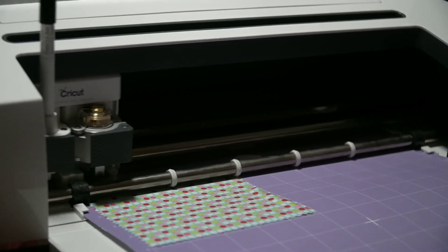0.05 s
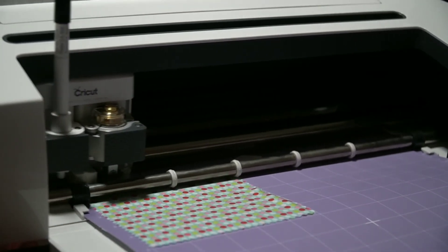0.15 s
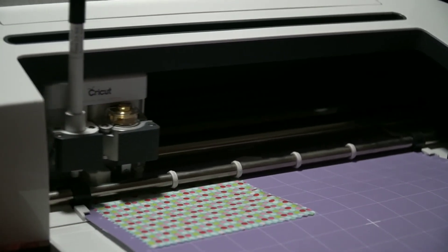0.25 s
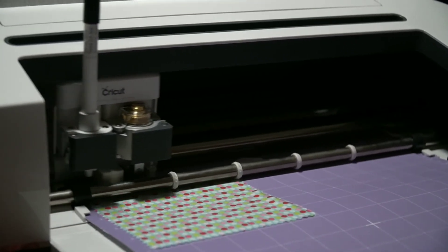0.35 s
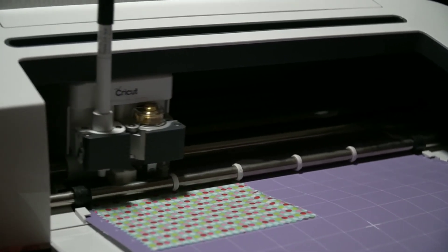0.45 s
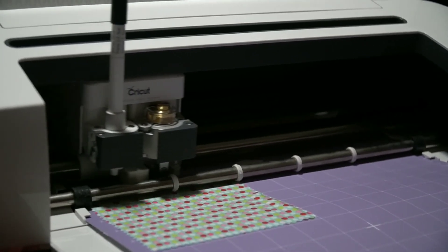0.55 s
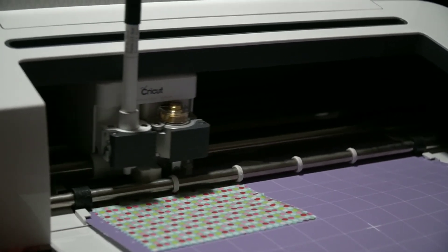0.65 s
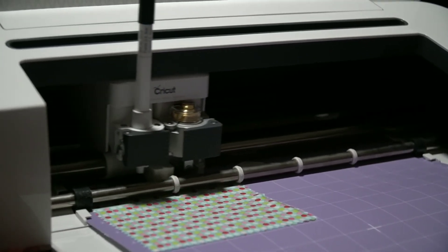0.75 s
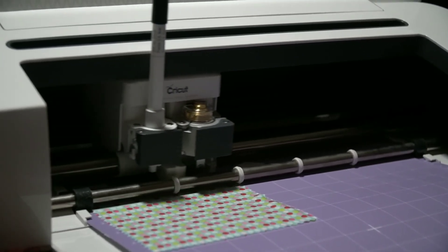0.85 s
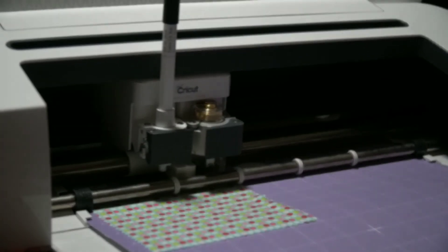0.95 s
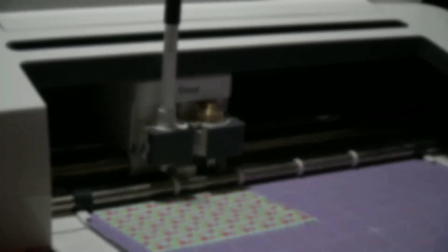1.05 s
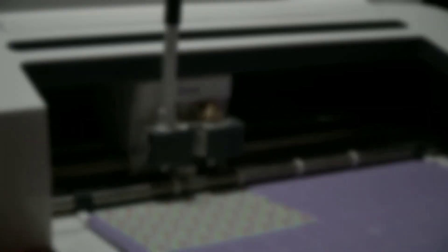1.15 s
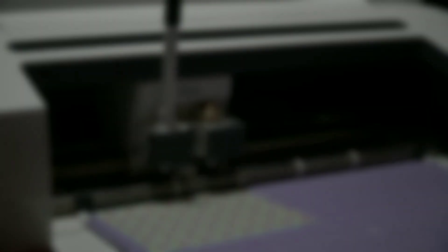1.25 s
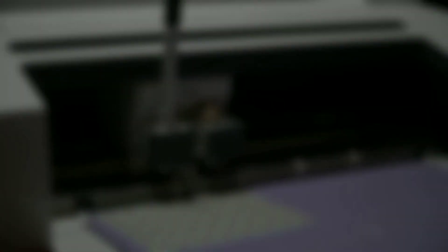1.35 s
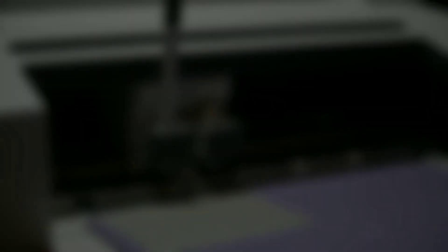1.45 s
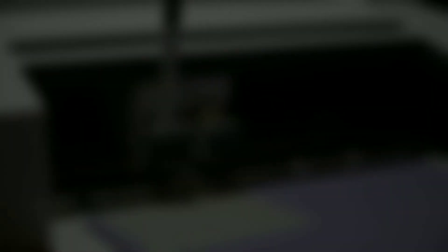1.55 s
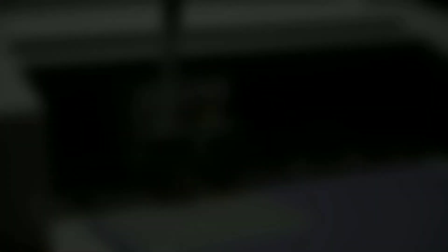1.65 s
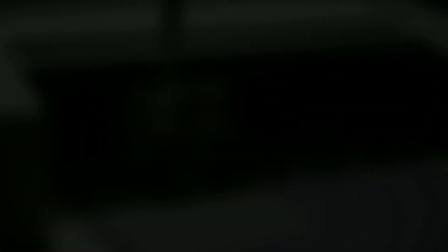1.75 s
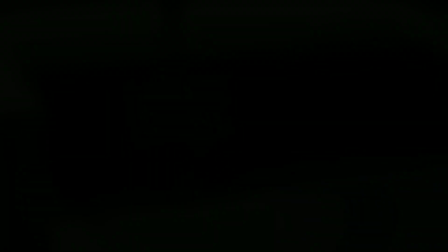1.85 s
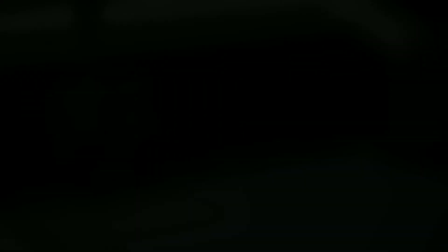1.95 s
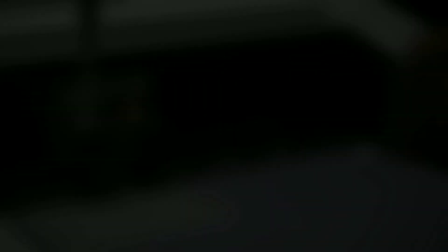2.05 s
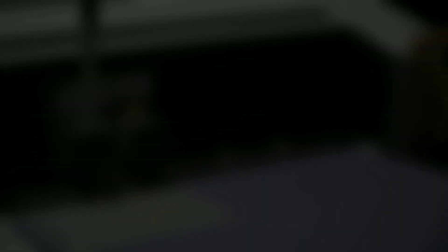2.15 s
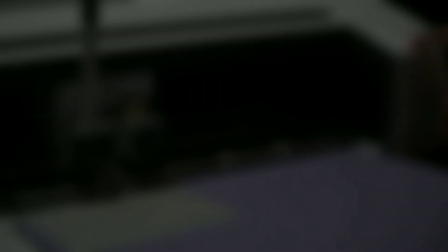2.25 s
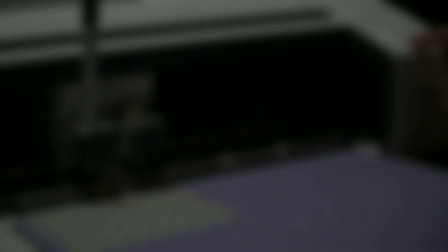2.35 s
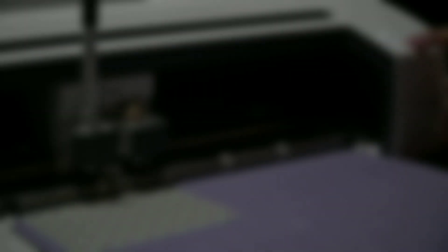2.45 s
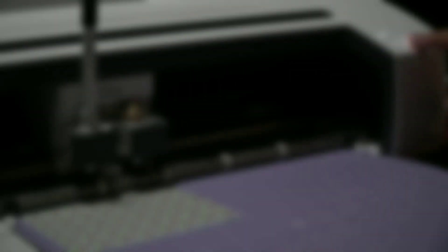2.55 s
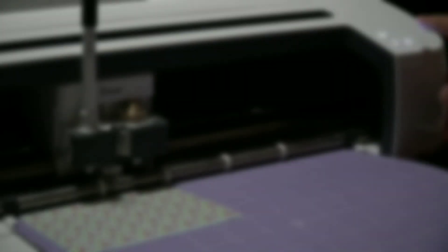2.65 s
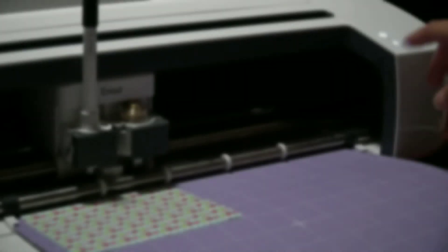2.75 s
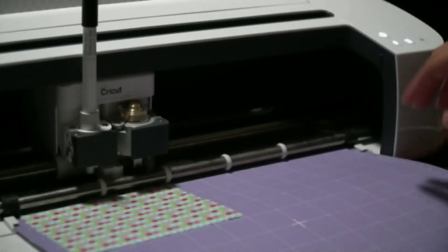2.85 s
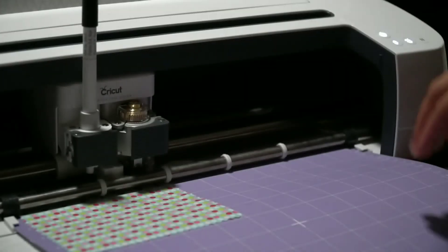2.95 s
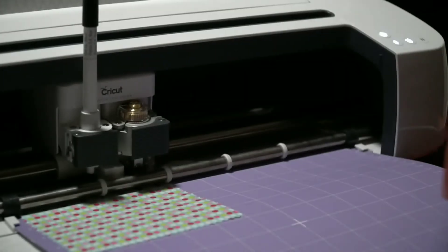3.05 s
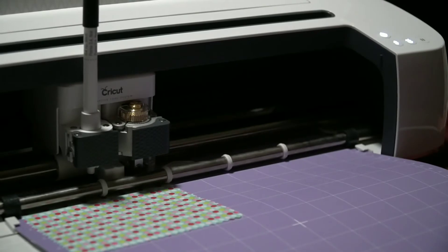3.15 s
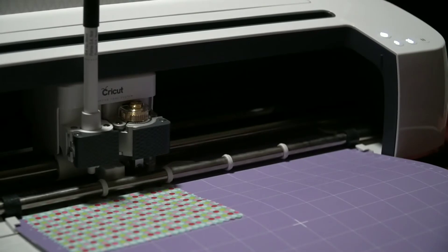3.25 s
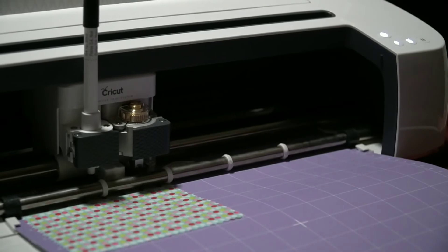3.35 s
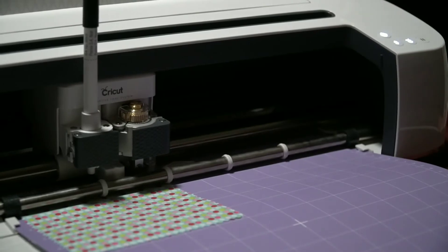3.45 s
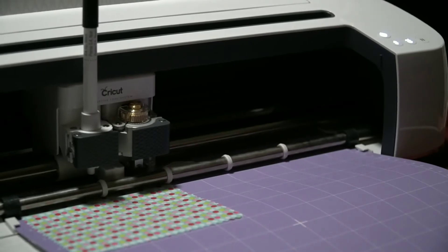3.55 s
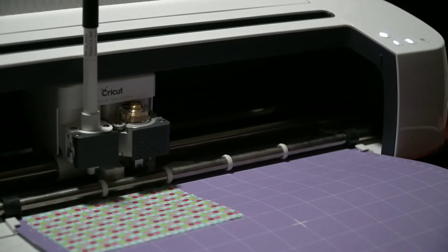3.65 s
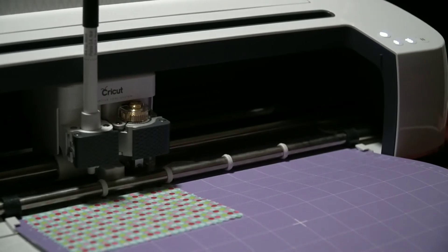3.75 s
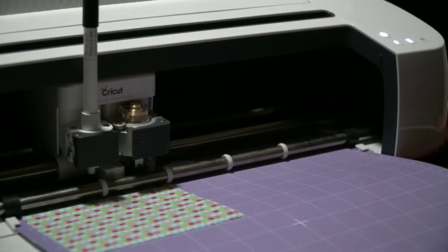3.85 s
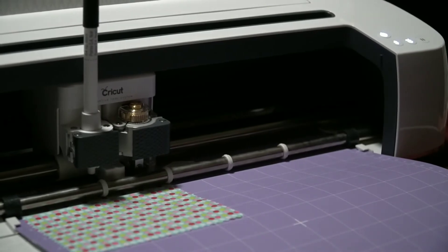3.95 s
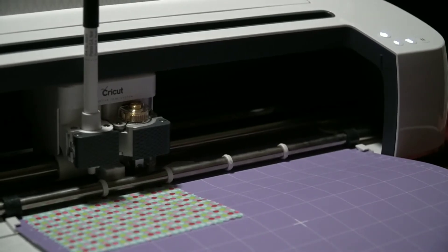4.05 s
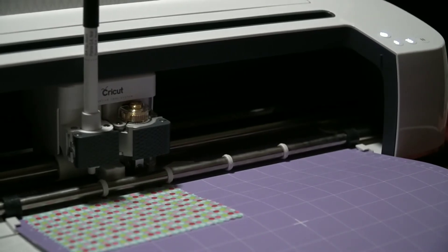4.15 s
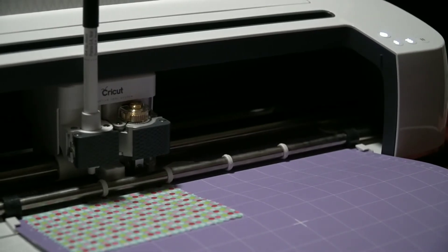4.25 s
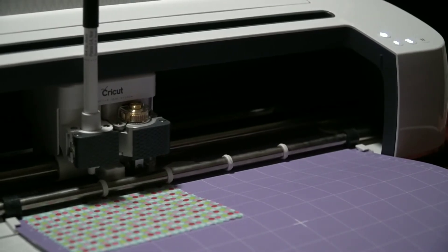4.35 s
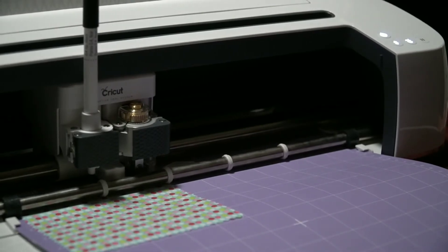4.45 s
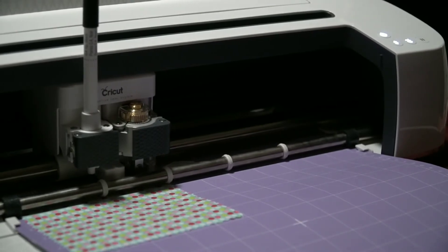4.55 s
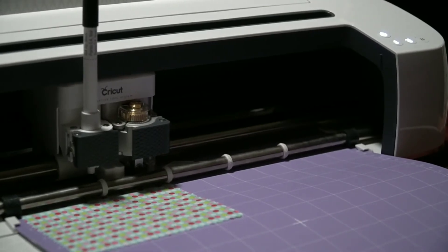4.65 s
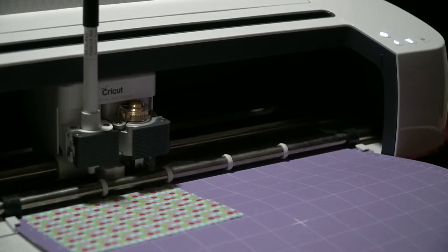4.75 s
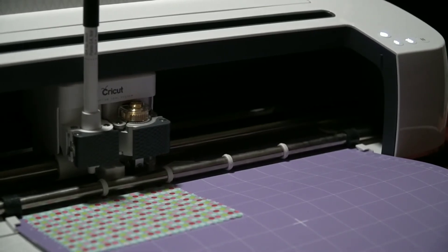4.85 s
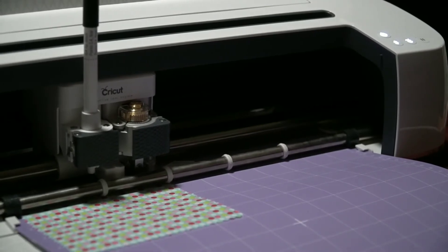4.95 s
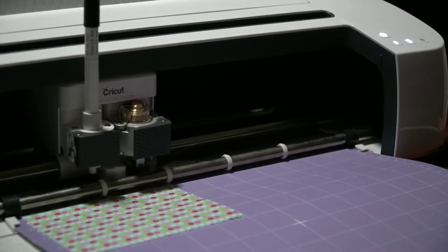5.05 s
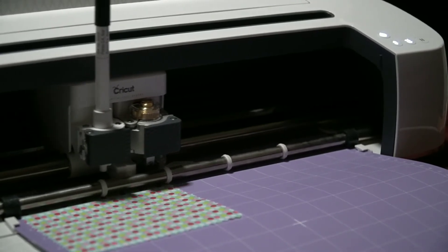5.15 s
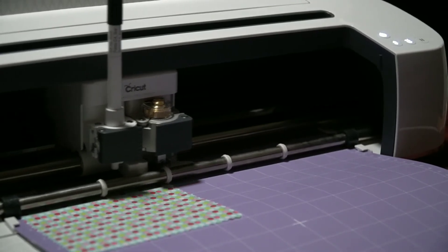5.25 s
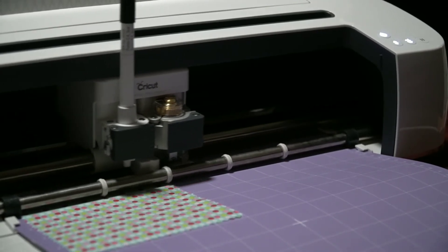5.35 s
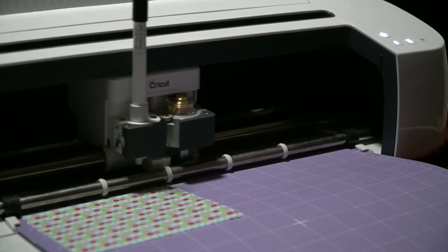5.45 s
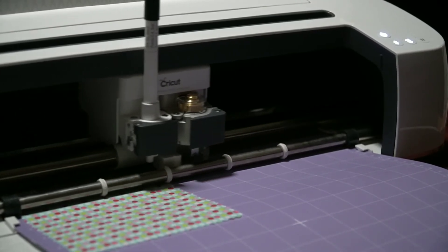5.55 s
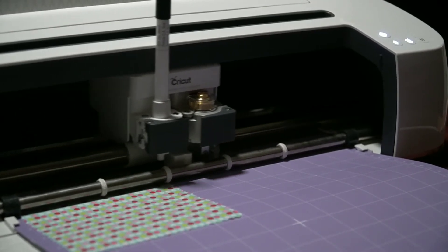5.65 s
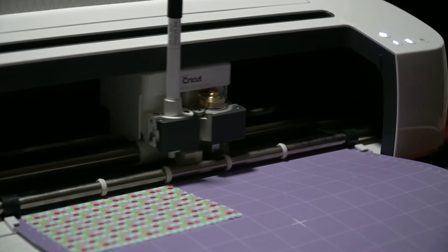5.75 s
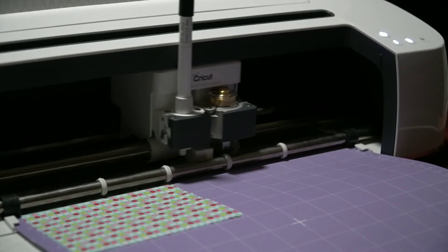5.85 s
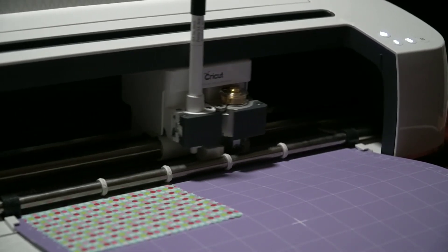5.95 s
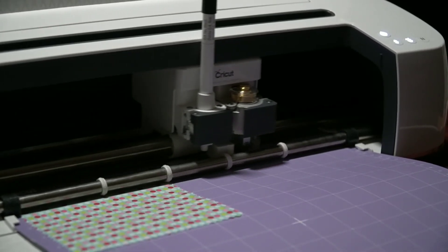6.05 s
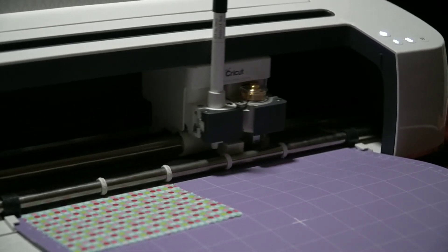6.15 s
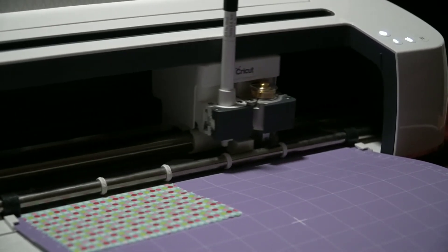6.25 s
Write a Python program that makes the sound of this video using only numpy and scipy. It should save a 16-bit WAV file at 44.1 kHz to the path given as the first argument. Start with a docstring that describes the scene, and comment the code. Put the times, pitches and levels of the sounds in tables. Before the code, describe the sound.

Close stereo pickup in a small room: a cutting machine's carriage is already driving, a buzzy geared whine with rasp and bright rail scratching. It brakes quickly to silence, leaving low hum, soft fan air and thin rapid chirps. A plastic button clicks down and up, the machine idles, then a tiny click and squeak start the same whir again to the end.

```python
"""Desktop cutting machine in a small room

The carriage drives along its rail, the machine idles, a button is pressed, and the carriage drives on.
Sliding gear tones and a part-repeating noise make the motor's whine and rasp; noise rings the rail, with one
tick a turn. A squeak and clicks are decaying partials and noise. Under it lie a wavering mains hum, a fan of
blade tone and air noise, thin chirps about seven times a second, a soft swish and a short low rumble."""
import sys
import numpy as np
from scipy import signal
from scipy.fft import rfft, irfft
from scipy.io import wavfile

SR = 44100
rng = np.random.default_rng(int(sys.argv[2]) if len(sys.argv) > 2 else 0)


def store_wav(level_fs):
    """Save 16-bit WAV to argv[1]."""
    pcm = np.round(np.clip(np.atleast_2d(level_fs), -1, 1) * 32767)
    wavfile.write(sys.argv[1], SR, pcm.T.astype(np.int16))


N = 277389
TIME = np.arange(N) / SR                                   # s
FREQ = np.maximum(np.arange(N // 2 + 1) * SR / N, 1)       # Hz, kept above zero for the logarithm
OPPOSITE = np.array([[1], [-1]])                           # left and right with opposite sign


def from_db(db):
    """Decibels to gain."""
    return 10 ** (np.asarray(db) / 20)


def in_time(rows, t=TIME):
    """Each column of a curve, read at the times t."""
    s, *columns = np.transpose(rows)
    return [np.interp(t, s, column) for column in columns]


def over_hz(points, axis=1):
    """One column of a spectrum at every frequency, drawn over log frequency."""
    points = np.array(points)
    return np.interp(np.log(FREQ), np.log(points[:, 0]), points[:, axis])


def rms_one(x):
    """Scale to unit power."""
    return x / np.sqrt(np.mean(np.abs(x) ** 2) + 1e-20)


def drift(rate_hz):
    """Smooth random wander of spread 1: twice low-passed noise, drawn every 40 samples."""
    step = 40
    r = np.exp(-2 * np.pi * rate_hz * step / SR)
    noise = rng.standard_normal(N // step + 2002)
    slow = signal.lfilter([1], [1, -2 * r, r * r], noise)[2000:]   # skip the filter's settling
    return np.interp(np.arange(N) / step, np.arange(len(slow)), rms_one(slow))


def cycles(rate, zero_s):
    """Cycles done at a changing rate, counted from a given moment."""
    count = np.cumsum(rate) / SR
    return count - np.interp(zero_s, TIME, count)


def pair(two, likeness):
    """Two unrelated signals become left and right with a given correlation."""
    c = np.clip(likeness, -1, 1)
    return np.sqrt((1 + c) / 2) * two[0] + np.sqrt((1 - c) / 2) * two[1] * OPPOSITE


def pan(balance_db):
    """Gains for left and right; positive leans left."""
    return from_db(0.5 * OPPOSITE * balance_db)


def white():
    """Two noises of 0 dB per Hz."""
    return rng.standard_normal((2, N)) * np.sqrt(SR / 2)


def colour(two, db, likeness):
    """Give two noises a spectrum and a stereo width."""
    return irfft(pair(rfft(two), likeness) * from_db(db), N)


def cut(x, hz, kind, order=2):
    """Butterworth filter."""
    sos = signal.butter(order, hz, kind, fs=SR, output="sos")
    return signal.sosfilt(sos, x + 1e-18)


def resonance(x, hz, width_hz):
    """Band resonance with gain 1 on top."""
    r = np.exp(-np.pi * width_hz / SR)
    zeros = np.array([1, 0, -1]) * (1 - r * r) / 2
    poles = [1, -2 * r * np.cos(2 * np.pi * hz / SR), r * r]
    return signal.lfilter(zeros, poles, x + 1e-18)


def burst(age, rise_s, t60):
    """Envelope of a contact: quick rise, exponential fall."""
    age = np.clip(age, 0, 2 * t60)
    return (1 - np.exp(-age / rise_s)) * from_db(-60 * age / t60)


def carriage(index):
    """One run: the motor ramps its speed steadily up and down; gears and rail grow loud with the speed."""
    # carriage runs: start_s, standstill_s, gear_db, gear_fade_db_per_s,
    # rail_friction_db, rail_fade_db_per_s, tick_over_friction_db
    runs = [(-.055, 1.145, -32, 0, -42, -3.5, 13), (5.037, 6.6, -31.5, -2, -45.5, -1.1, 12.5)]
    # where the drive stands in each run: turns_per_s, tick_s, gear_wheel_crest_s, pulley_crest_s
    drive = [(50.22, .1052, .123, .115), (50.18, 5.1981, 5.267, 5.286)]
    start_s, stop_s, gear_db, gear_fade, rail_db, rail_fade, tick_db = runs[index]
    rate, tick_s, wheel_s, pulley_s = drive[index]
    speed_up_s, brake_s = 0.135, 0.17
    gear_speed_power, rail_speed_power = 1.47, 6
    wheel_turns, pulley_turns = 4, 6                # motor turns per revolution
    wheel_surge_db, pulley_surge_db = 0.9, 0.46

    speeding_up = (TIME - start_s) / speed_up_s
    braking = (stop_s - TIME) / brake_s
    speed = np.clip(np.minimum(speeding_up, braking), 0, 1)
    age = np.clip(TIME, start_s, stop_s) - start_s
    turns = cycles(rate * speed, tick_s)

    # two slightly eccentric wheels make the gears surge
    wheel = np.cos(2 * np.pi * cycles(rate * speed / wheel_turns, wheel_s))
    pulley = np.cos(2 * np.pi * cycles(rate * speed / pulley_turns, pulley_s))
    surge_db = wheel_surge_db * wheel + pulley_surge_db * pulley
    gear_gain = speed ** gear_speed_power * from_db(gear_db + gear_fade * age + surge_db)

    # the rail is rougher in some places than in others
    patches_db = 1.25 * drift(14)
    rail_gain = speed ** rail_speed_power * from_db(rail_db + rail_fade * age + patches_db)
    return gear_gain * gears(turns, speed, rate, index) + rail_gain * rail(turns, rate, tick_db)


def gears(turns, speed, rate, index, flutter=0.5, repeat_share=0.39, spread_rad=0.23):
    """Mesh tones over a rasp that partly repeats, as the same teeth meet every fourth turn at full speed."""
    # motor turning, mesh tones and sidebands at full speed: pitch_hz, first_run_db, second_run_db
    tone_rows = [(50.1, -27, -29), (275.6, -25, -24), (527, -23, -28), (551.3, -18.5, -20),
                 (826.6, -14.5, -15.5), (877, -27, -22), (952, -18.5, -28), (1052, -19, -23),
                 (1102.2, -10, -10.5), (1153, -27, -21), (1226.2, -19.5, -17), (1277.4, -11.5, -13.5),
                 (1378, -11.5, -12), (1402, -16, -16), (1441, -23, -20), (1614, -16, -16),
                 (1691, -17.5, -14.5), (1825.5, -26, -18), (1878.5, -16.5, -24), (1889, -24, -16),
                 (1979, -26, -21), (2017, -20, -26), (2029, -27, -22), (2078, -21, -28), (2102, -24, -25),
                 (2428, -27, -27), (2520, -34, -29)]
    # rasp of the gear train, relative to the gear band: pitch_hz, first_run_db_per_hz, second_run_db_per_hz
    rasp_rows = [(100, -55, -66), (215, -42, -40), (356, -45.5, -47.5), (507, -43.5, -40.5),
                 (737, -37, -35.5), (900, -43, -42), (1240, -38, -36), (1420, -31, -30.5), (1550, -41, -40),
                 (1580, -31.5, -30), (1933, -39, -31.5), (1861, -40, -42), (2160, -40, -41.5),
                 (2600, -48, -47.5), (4130, -57, -56), (8000, -63.5, -68)]
    # stereo likeness of the rasp: pitch_hz, correlation (no unit)
    likeness_rows = [(500, 0.95), (1500, 0.93), (2700, 0.76), (4400, 0.36)]
    tooth_cycle_hz = 12.525

    # seconds of travel at full speed, slightly unsteady
    travel = turns / rate + 4e-5 * drift(8)
    body_db = over_hz(rasp_rows, axis=index + 1)
    tones = 0
    for hz, *levels in tone_rows:
        # away from full speed each tone slides through the resonances of the housing
        slide_db = np.interp(hz * speed, FREQ, body_db) - np.interp(hz, FREQ, body_db)
        gain = np.sqrt(2) * from_db(levels[index] + slide_db)
        # reflections give every tone its own phase at each ear
        phase = 2 * np.pi * rng.random() + spread_rad * rng.choice([-1, 1]) * OPPOSITE
        surge = 1 + flutter * hz / 1400 * drift(8.8)   # the higher tones surge more
        tones = tones + gain * surge * np.sin(2 * np.pi * hz * travel + phase)

    # one loop of flat-spectrum noise stands for the teeth
    period = round(SR / tooth_cycle_hz)
    spectrum = np.exp(2j * np.pi * rng.random((2, period // 2 + 1)))
    teeth = rms_one(irfft(spectrum, period)) * np.sqrt(SR / 2)
    repeating = teeth[:, np.arange(N) % period]
    rasp = np.sqrt(repeat_share) * repeating + np.sqrt(1 - repeat_share) * white()
    once_a_turn = 0.14 * np.cos(2 * np.pi * (turns - 0.4))
    rasp = rasp * (1 + once_a_turn + 0.17 * drift(9.4))
    rasp = colour(rasp, body_db - 0.5, over_hz(likeness_rows))
    # slow gears mostly rasp; the tones come with speed
    return (tones * speed ** 2 + rasp) * pan(-1.2)


def rail(turns, rate, tick_db, uneven_db=4.5):
    """Fluttering sliding friction and one scratchy tick per motor turn ring the rail and carriage."""
    # ringing of rail and carriage: pitch_hz, width_hz, friction_db, tick_db
    rail_modes = [(3223, 50, 14, -8), (4150, 170, 6.5, 14), (5016, 274, 10, 7.5), (6240, 1050, -2, 3),
                  (7290, 600, 3.5, 9.5), (8740, 1150, 1, 6.5), (10220, 630, 4, 13.5), (10800, 510, -9, 0)]
    turn = np.floor(turns).astype(int)
    strength = from_db(uneven_db * rng.uniform(-1, 1, 512))[turn % 512]   # each turn ticks differently
    tick_shape = burst(turns % 1 / rate, rise_s=0.00062, t60=0.011)
    ticks = strength * tick_shape * pair(rng.standard_normal((2, N)), 0.61)
    sliding = from_db(2.2 * drift(100)) * pair(rng.standard_normal((2, N)), 0.39)
    out = np.zeros((2, N))
    for k, (hz, width_hz, slide_db, hit_db) in enumerate(rail_modes):
        drive = from_db(slide_db) * sliding + from_db(tick_db + hit_db) * ticks
        out += (-1) ** k * resonance(drive, hz, width_hz)   # neighbouring modes swing in opposite phase
    return out * pan(1.0)


def gear_catch(rise_s=0.0036):
    """Teeth take up the load as the second run begins and ring the gearbox in a brief squeak."""
    # squeak: start_s, pitch_hz, level_db, t60_s
    squeaks = [(5.1165, 1890, -24, .035)]
    out = 0
    for s, hz, db, t60 in squeaks:
        age = TIME - s
        out = out + from_db(db) * burst(age, rise_s, t60) * np.sin(2 * np.pi * hz * age)
    return out * pan(-0.89)


def clicks(crack_db=-30, clack_db=-12, tail_db=-34, room_t60=0.21, thud_top_hz=900, wall_hz=7000):
    """A noise crack and quick contacts ring the casing and its dense upper modes; the room answers briefly."""
    # button going down and up, a faint rattle, the drive taking up slack: start_s, snap_db, thud_db
    click_rows = [(2.3784, -4, -1.5), (2.5699, -1, 7), (2.62, -17, -17), (5.083, -17, -11)]
    # contacts within one click: delay_s, level_db
    contacts = [(0, -6), (.0015, 5.5), (.0052, 1)]
    # plastic casing: pitch_hz, level_db, t60_s
    casing = [(472, -18.5, 0.02), (542, -23, 0.013), (704, -28.5, 0.011), (1226, -22.5, 0.021),
              (1399, -22.5, 0.017), (1680, -26, 0.013), (2130, -30, 0.02), (2230, -26, 0.018),
              (2553, -30, 0.023)]
    out = np.zeros((2, N))
    t = np.arange(SR // 2) / SR

    def grit(likeness):
        """A short stretch of stereo noise."""
        return pair(rng.standard_normal((2, len(t))), likeness)

    for s, snap_db, thud_db in click_rows:
        blow = from_db(crack_db + snap_db) * burst(t, 0.0007, 0.032) * grit(0.6)
        for delay, contact_db in contacts:
            age = t - delay
            body = 0
            for hz, db, t60 in casing:
                mode_db = db + (thud_db if hz < thud_top_hz else snap_db)
                body = body + from_db(mode_db) * burst(age, 0.0023, t60) * np.sin(2 * np.pi * hz * age)
            scrape = burst(age, 0.00016, 0.0049) * grit(0.68)
            clack = from_db(clack_db + snap_db) * cut(scrape, [1100, 2700], "band", order=3)
            blow = blow + from_db(contact_db) * (body + clack)
        # room: decaying noise after 5 ms, dulled by the walls
        tail = from_db(tail_db) * burst(t - 0.005, 0.00076, room_t60) * grit(0.88)
        room = cut(tail, wall_hz, "low", order=1)
        start = round(s * SR)
        answer = signal.fftconvolve(blow, room, axes=1)[:, :len(t)]
        out[:, start:start + len(t)] += blow + answer
    return cut(out, 504, "high", order=3)   # a small panel radiates little bass


def chirping(pulse_s=0.00224, pulse_hz=6370, fall_hz=60, rough=0.3):
    """Each chirp swells in narrow hiss, gives a few sharp, nearly pure pulses and sinks in pitch as it fades."""
    # pace of the chirping: time_s, chirps_per_s
    pace_rows = [(0, 6.747), (1.05, 6.89), (1.35, 6.46), (1.7, 7.2), (2.3, 6.82), (3.4, 6.832),
                 (3.8, 6.555), (4.6, 6.883), (6.29, 6.76)]
    # course of one chirp: time_from_loudest_pulse_s, level_db, centre_hz
    shape = [(-.075, -61, 5940), (-.04, -74, 6080), (-.02, -57, 6200), (.005, -49.5, 6170),
             (.03, -50.5, 6100), (.055, -58.5, 6050), (.075, -56, 6000)]
    # thin hiss between the chirps: time_s, level_db
    bed = [(0, -58.5), (2.3, -59.5), (3.5, -57), (4.5, -57), (6.29, -57.5)]
    # sharp pulses inside a chirp: time_from_loudest_s, level_db
    pulses = [(-.022, -52.5), (-.001, -47), (0.016, -50.5), (0.033, -74)]
    first_chirp_s = 0.076

    pace = in_time(pace_rows)[0]
    count = cycles(pace, first_chirp_s)
    age = (count - np.round(count)) / pace   # seconds from the nearest chirp's loudest pulse
    level_db, centre_hz = in_time(shape, age)
    hiss_gain = np.hypot(from_db(level_db), from_db(in_time(bed)[0]))
    out = hiss_gain * narrow_hiss(centre_hz, half_width_hz=424)
    for s, db in pulses:
        within = np.clip((age - s) / pulse_s, -5, 5)   # time in pulse widths
        hz = pulse_hz - fall_hz * within + 50 * drift(145.0)
        phase = 2 * np.pi * np.cumsum(hz) / SR + 0.65 * np.array([drift(32), drift(28)])
        envelope = np.exp(-0.5 * within ** 2) * (1 + rough * drift(33))
        out = out + np.sqrt(2) * from_db(db) * envelope * np.sin(phase)
    return out * pan(1.3)


def narrow_hiss(centre_hz, half_width_hz):
    """Diffuse noise of rms 1: slow complex noise carried up to a moving centre pitch."""
    noise = rng.standard_normal((2, N)) + 1j * rng.standard_normal((2, N))
    slow = cut(noise, half_width_hz, "low", order=3)
    carrier = np.exp(2j * np.pi * np.cumsum(centre_hz) / SR)
    return pair(rms_one(np.real(slow * carrier)), 0.24)


def hum_and_fan(fan_flutter=0.25):
    """A mains hum wavering in level, the fan's blade tone wandering in pitch, and its rush of air."""
    # fan air and room: pitch_hz, level_db_per_hz
    air_rows = [(20, -84), (50, -75.5), (70, -74), (102, -63.5), (170, -75.5), (205, -73), (290, -79.5),
                (400, -76), (540, -71.5), (800, -76.5), (1400, -83.5), (2400, -88), (4400, -98.5),
                (7500, -102.3), (11000, -107.3)]
    # left-right likeness of the air: pitch_hz, correlation (no unit)
    likeness_rows = [(40, .98), (110, 1), (300, .92), (650, .88), (1400, .62), (2600, .27), (4500, .18),
                     (10000, .1)]
    hum_hz, hum_db = 120, -40
    fan_hz, fan_db, fan_wander_hz = 613.6, -50.3, 5.5

    hum = from_db(hum_db) * (1 + 0.12 * drift(4.8)) * np.sin(2 * np.pi * hum_hz * TIME)
    blade_hz = fan_hz + fan_wander_hz * drift(2.2)
    blade_gain = from_db(fan_db) * (1 + fan_flutter * drift(4.6))
    blades = blade_gain * np.sin(2 * np.pi * np.cumsum(blade_hz) / SR)
    air = colour(white(), over_hz(air_rows), over_hz(likeness_rows))
    air = air + cut(air, 750, "high", order=1) * (pan(2.2) - 1)   # the treble leans left
    return np.sqrt(2) * (hum + blades * pan(1.6)) + air


def stirrings():
    """A soft bright swish and a short low rumble, both filtered noise under a drawn level."""
    # swish before its filter: time_s, level_db_per_hz
    swish_rows = [(4.4, -125), (4.58, -107), (4.68, -103), (4.78, -102), (4.83, -125)]
    # rumble before its filter: time_s, level_db_per_hz
    rumble_rows = [(5.98, -95), (6.06, -61), (6.15, -62), (6.2, -74), (6.29, -67)]
    swish = from_db(in_time(swish_rows)[0]) * cut(pair(white(), 0.81), 2100, "high")
    rumble = from_db(in_time(rumble_rows)[0]) * cut(pair(white(), 0.92), [32, 68], "band")
    return swish + rumble


def scene():
    """Two carriage runs over the idling machine."""
    drive = carriage(index=0) + carriage(index=1) + gear_catch()
    return drive + clicks() + chirping() + hum_and_fan() + stirrings()


def record(dry):
    """A steep elliptic low-pass cuts the top."""
    cutoff_hz = 11080
    return signal.sosfilt(signal.ellip(12, 0.2, 80, cutoff_hz, fs=SR, output="sos"), dry)


dry = scene()
out = record(dry)
store_wav(out)
```